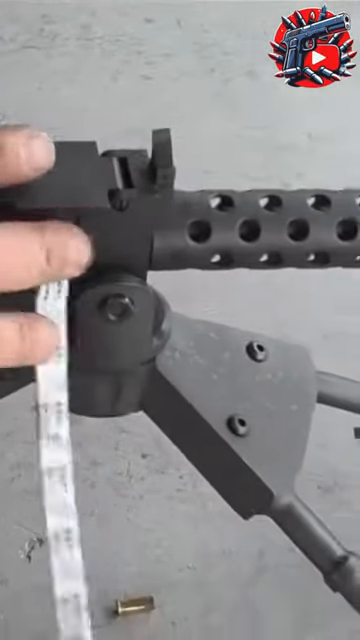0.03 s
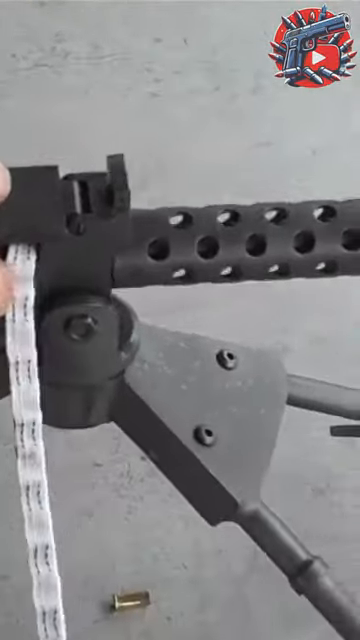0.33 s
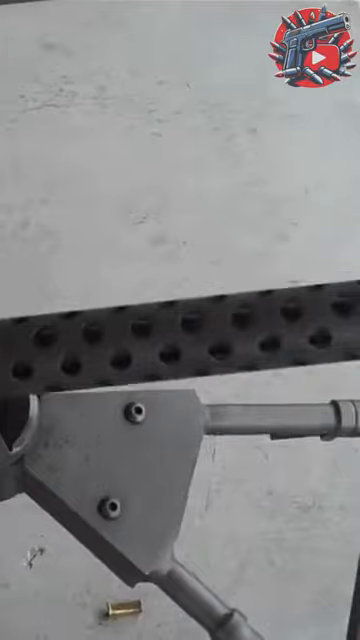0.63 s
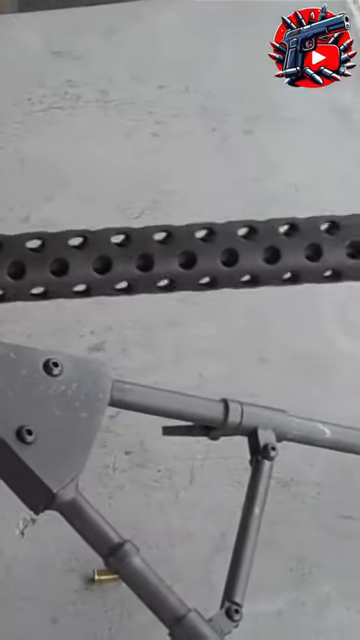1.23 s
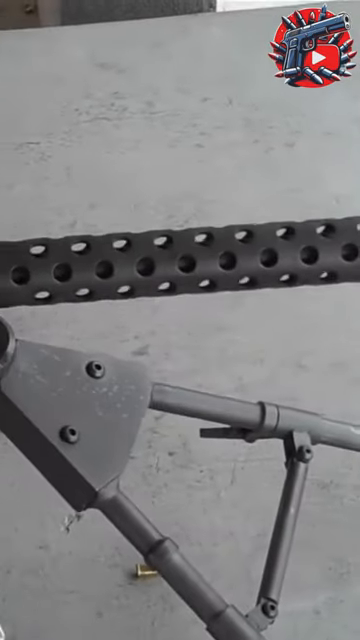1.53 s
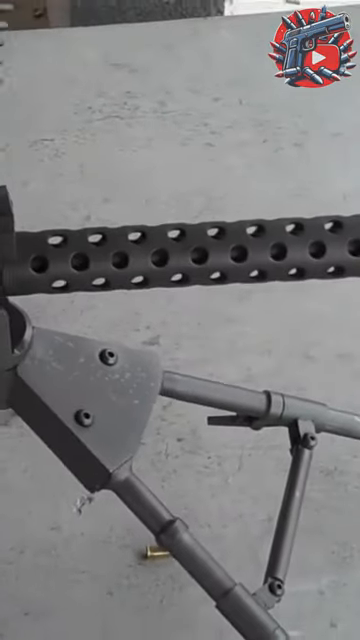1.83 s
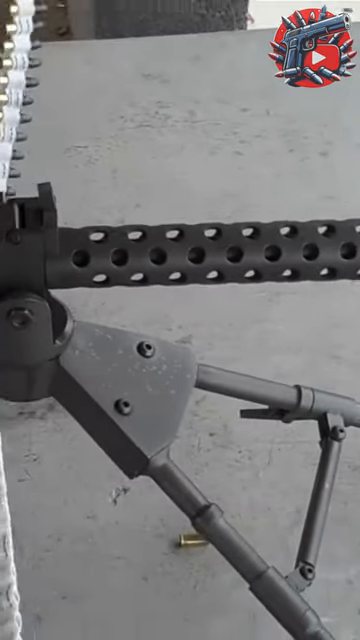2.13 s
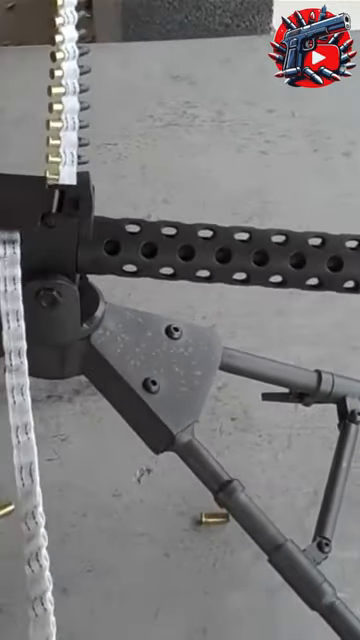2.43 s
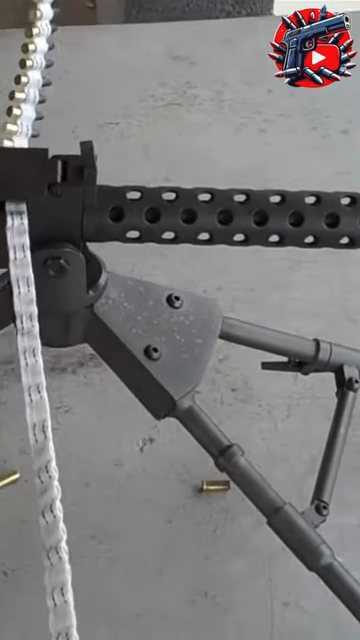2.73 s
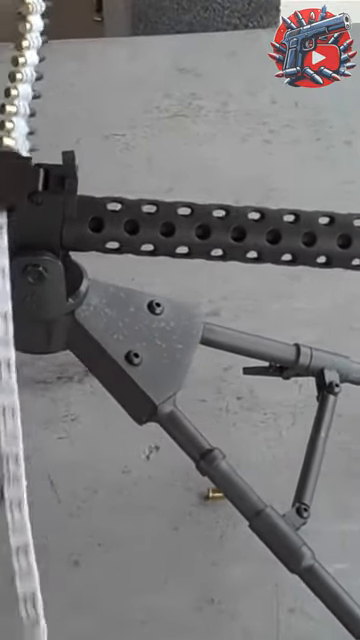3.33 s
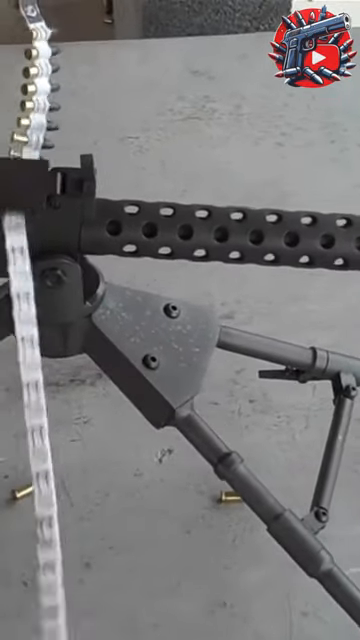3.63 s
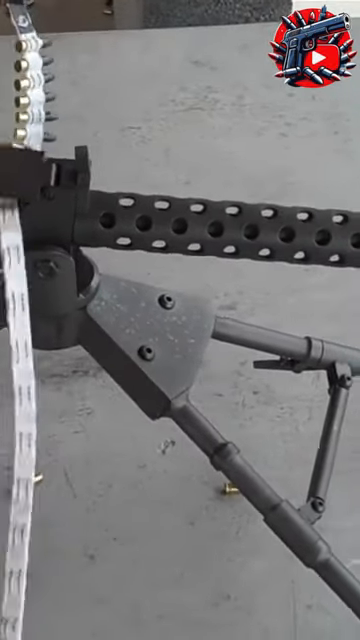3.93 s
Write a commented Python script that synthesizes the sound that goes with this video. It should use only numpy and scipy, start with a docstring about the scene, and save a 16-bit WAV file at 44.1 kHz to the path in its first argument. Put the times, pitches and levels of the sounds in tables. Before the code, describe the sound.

A small machine gun is readied and fired close by. Cartridges tinkle faintly, the action is cocked with steel clacks, and after a pause two quick bursts of shots ring out in a hard-walled shooting bay.

```python
"""A miniature belt-fed machine gun on a tripod, close to one microphone in a hard-walled shooting bay.
Over a faint rumble, brass cartridges tinkle as the belt is fed, the action is worked with steel
clacks, and the cloth belt slides over the floor. Then come two quick bursts, about fifteen shots
a second: each is a push of muzzle gas and a crack that swells in the near walls and dies in the room."""
import sys
import numpy as np
from scipy import signal
from scipy.fft import rfft, irfft
from scipy.io import wavfile

SR = 44100
rng = np.random.default_rng(int(sys.argv[2]) if len(sys.argv) > 2 else 0)


def file_out(sig):
    """Save sig as 16-bit WAV at sys.argv[1]."""
    # one column per channel
    cols = np.atleast_2d(sig).T
    # limit, then scale
    lim = np.clip(cols, -1, 1)
    pcm = np.round(lim * 32767).astype(np.int16)
    wavfile.write(sys.argv[1], SR, pcm)


N = 176400
T = np.arange(N) / SR


def from_db(db):
    """Decibels to gain."""
    return 10 ** (np.asarray(db) / 20)


def at_hz(points, hz):
    """Read a table on a log-frequency axis."""
    freqs, values = np.transpose(points)
    return np.interp(np.log(np.maximum(hz, 1)), np.log(freqs), values)


def add(out, start, sound):
    """Mix a sound in at a time in seconds."""
    i = int(start * SR)
    out[i:i + len(sound)] += sound[:N - i]


def colour(x, spectrum, tilt_db=0, size=4096):
    """Causal filter with a spectrum and a tilt per octave above 1 kHz; white noise keeps its level."""
    hz = np.arange(size // 2 + 1) * SR / size
    gain = from_db(at_hz(spectrum, hz) + tilt_db * np.log2(np.maximum(hz, 1000) / 1000))
    cepstrum = irfft(np.log(gain / np.sqrt(np.mean(gain ** 2))))
    cepstrum[1:size // 2] *= 2   # fold to minimum phase
    cepstrum[size // 2 + 1:] = 0
    return signal.fftconvolve(x, irfft(np.exp(rfft(cepstrum))))[:len(x)]


def ring(hits, modes, spread_db=0):
    """Hits (time, level) ring decaying modes, whose strengths scatter by spread_db at each hit."""
    out, t = np.zeros(N), T[:SR // 2]
    shapes = np.array([from_db(db - 60 * t / t60) * np.sin(2 * np.pi * hz * t) * (-1) ** k
                       for k, (hz, db, t60) in enumerate(modes)])
    for start, db in hits:
        add(out, start, from_db(db + spread_db * rng.standard_normal(len(modes))) @ shapes)
    return out


def spray(decay_s):
    """A short spray of tiny impulses that dies away."""
    t = T[:SR // 4]
    return rng.choice([-1, 1], len(t)) * np.exp(-t / decay_s)


def resonate(x, resonances):
    """Lift or cut narrow bands of a sound."""
    return x + sum((from_db(db) - 1) * signal.lfilter(*signal.iirpeak(hz, hz / width, fs=SR), x)
                   for hz, width, db in resonances)


# level of a faint low rumble that comes and goes: (time [s], level [dB])
RUMBLE_LEVEL = [(0, -96), (.6, -68.5), (1.05, -59.5), (1.35, -81), (1.55, -62.5), (1.8, -74), (2.2, -72.5),
                (2.45, -60.5), (2.9, -54.5), (3.15, -49.5), (3.6, -63)]
# spectra of the rumble and of the still air: (frequency [Hz], relative level [dB])
RUMBLE_SPECTRUM = [(25, 7), (60, -10.5), (150, -20.5), (400, -25.5), (900, -34), (3000, -56)]
AIR_SPECTRUM = [(25, 10.5), (60, -10.5), (150, -4), (400, -10), (900, -9.5), (2200, -17.5), (4000, -23),
                (8000, -27), (13500, -26)]

def background(air_db=-74):
    """The still air of the bay and a faint low rumble that comes and goes."""
    level_db = np.interp(T, *np.transpose(RUMBLE_LEVEL))
    rumble = from_db(level_db) * colour(rng.standard_normal(N), RUMBLE_SPECTRUM)
    return rumble + from_db(air_db) * colour(rng.standard_normal(N), AIR_SPECTRUM)


# cartridges touch, close by: (time [s], relative level [dB])
CASE_TOUCHES = [(0.0743, -58.5), (0.147, -60), (0.2142, -53), (0.2669, -52), (0.4672, -52), (0.5377, -59),
                (0.601, -52), (0.7025, -53.5), (0.7786, -60)]
# ring of a brass case: (frequency [Hz], relative level [dB], T60 [s])
BRASS_MODES = [(11910, -21.5, 0.29)]
# spectrum of a touch: (frequency [Hz], relative level [dB])
TOUCH_SPECTRUM = [(300, -39), (3500, -18), (4600, -7), (5350, 4.5), (6200, -12), (7500, -21), (13500, -32)]

def cartridges(tick_db=-5, jingle_db=-24):
    """Brass cases tick and ring in the belt; their neighbours shiver after each touch."""
    out = ring(CASE_TOUCHES, BRASS_MODES, spread_db=3)
    for start, db in CASE_TOUCHES:
        tick = from_db(tick_db) * spray(decay_s=0.0015)
        jingle = from_db(jingle_db) * spray(decay_s=0.049)
        add(out, start, from_db(db) * colour(tick + jingle, TOUCH_SPECTRUM))
    return out


# reverberation of the bay: (frequency [Hz], T60 [s])
BAY_DECAY = [(100, 0.42), (260, 0.43), (700, 0.51), (1840, 0.35), (4850, 0.31), (12800, .27)]

def bay_tail(rise_s):
    """One second of reverberation between hard walls: each band dies at its own rate."""
    white, hz, t = rfft(rng.standard_normal(SR)), np.arange(SR // 2 + 1), T[:SR]
    edges = np.r_[0, np.geomspace(125, SR / 2, 12)]
    tail = np.zeros(SR)
    for low, high in zip(edges, edges[1:]):
        band = irfft(white * ((hz >= low) & (hz < high)))
        tail += band * from_db(-60 * t / at_hz(BAY_DECAY, (low + high) / 2))
    return tail * (1 - np.exp(-t / rise_s))


def in_bay(direct, bounce_s=0.006, bounce_db=-17, reverb_db=-15):
    """A close sound reaches the microphone directly, off the floor and as reverberation."""
    bounce = from_db(bounce_db) * np.interp(T - bounce_s, T, direct, left=0)
    tail = bay_tail(rise_s=0.002)
    reverb = from_db(reverb_db) * signal.fftconvolve(direct, tail / np.linalg.norm(tail))[:N]
    return direct + bounce + reverb


# fingers on the gun: (time [s], contact level [dB], mount hum [dB])
FINGER_BUMPS = [(0.3631, -56, -70), (.53, -78, -70), (.59, -74, -72), (.74, -82, -76), (2.291, -69, -69)]
# spectrum of a contact on steel: (frequency [Hz], relative level [dB])
STEEL_SPECTRUM = [(100, -36), (500, -14), (800, -13), (1200, -8), (1900, -4.5), (2600, 4), (4000, -4.5),
                  (5200, -3), (8000, -10), (13500, -14.5)]
# tripod and cradle: (frequency [Hz], relative level [dB], T60 [s])
MOUNT_MODES = [(158, -25.5, 0.274), (299, -5.5, 0.23), (800, -4, 0.13), (828, 2.5, 0.17)]

def finger_bumps():
    """Fingers knock dully on the steel and set the mount humming."""
    out = ring([(start, hum_db) for start, _, hum_db in FINGER_BUMPS], MOUNT_MODES, spread_db=3)
    for start, db, _ in FINGER_BUMPS:
        add(out, start, from_db(db) * colour(spray(decay_s=0.0037), STEEL_SPECTRUM, tilt_db=-4))
    return out


# travel of the steel parts: (time [s], length [s], level [dB], tilt [dB/octave])
SLIDES = [(.46, .13, -77.5, -3.5), (1.076, 0.075, -52, -5), (1.16, 0.14, -59.5, -5.5), (1.532, 0.1, -54, 1),
          (1.806, 0.018, -44.5, 0.5), (1.854, 0.014, -38, 2.1)]
# what sliding stirs in the gun: (frequency [Hz], width [Hz], gain [dB])
SCRAPE_RESONANCES = [(826, 45, 23), (1430, 60, 8), (2850, 130, 0), (3550, 340, 3.5)]

def steel_slides():
    """Steel rubs on steel with a gritty scrape that grows until the part stops."""
    out, t = np.zeros(N), T[:SR // 4]
    for start, length, db, tilt_db in SLIDES:
        grit = rng.laplace(0, np.sqrt(0.5), len(t)) * (t / length) * (t < length)
        scrape = resonate(colour(grit, STEEL_SPECTRUM, tilt_db), SCRAPE_RESONANCES)
        add(out, start, from_db(db) * scrape)
    return out


# the action, at close range:
# (time [s], level [dB], contact decay [s], tilt [dB/octave], receiver ring [dB], mount hum [dB])
CLACKS = [(1.154, -26.5, 0.0045, -2.5, -33.5, -45.5), (1.2242, -36.5, 0.0016, -5, -62, -60),
          (1.229, -33, 0.0048, -7.5, -42.5, -46), (1.2607, -37, 0.0048, -6, -53, -47),
          (1.348, -54.5, 0.0014, -4, -80, -66), (1.477, -58, 0.018, 3.5, -87, -83),
          (1.499, -56.5, 0.0018, 7, -80, -92), (1.5362, -51.5, 0.0043, 1.1, -71, -72),
          (1.5511, -39, 0.0014, -1.5, -59, -60), (1.5566, -42.5, 0.0091, 2.5, -59, -77),
          (1.573, -43.5, 0.0036, -0.2, -70, -76), (1.6052, -26, 0.0025, -3.4, -56.5, -73),
          (1.612, -33.5, 0.003, 8.3, -58, -70), (1.6227, -20.5, 0.0019, -0.5, -53, -75.5),
          (1.6846, -41.5, 0.0046, -6, -47, -54.5), (1.8177, -36, 0.0069, 3.2, -58.5, -75.5),
          (1.8258, -26, 0.0026, -0.1, -67, -65), (1.8368, -40.5, 0.0067, 0.7, -77, -77),
          (1.8532, -36.5, 0.0037, 6, -66, -81), (1.8692, -21, 0.0083, 7.3, -76, -80),
          (1.8724, -18, 0.002, -4.5, -57.5, -51), (1.883, -26.5, 0.0066, 2, -59, -86),
          (1.9883, -39.5, 0.002, 7, -57.5, -64.5), (3.1663, -22, 0.018, 10.5, -38, -34)]
# receiver and barrel jacket: (frequency [Hz], relative level [dB], T60 [s])
RECEIVER_MODES = [(1215, -20.5, 0.12), (1420, -1.5, .13), (1590, -5, 0.094), (1805, -2, .12),
                  (1945, -3.5, 0.11), (2340, -1, 0.067), (2630, -3.5, 0.042), (2700, -12, 0.15),
                  (3500, 3, 0.036), (4280, -8, 0.048), (5060, -10, 0.06), (6740, -17, 0.047),
                  (8000, -33, .1), (10840, -32, 0.11), (11800, -25, 0.17)]

def steel_clacks():
    """Steel parts meet; each impact rings the receiver and the mount."""
    contacts = np.zeros(N)
    for start, db, decay_s, tilt_db, _, _ in CLACKS:
        add(contacts, start, from_db(db) * colour(spray(decay_s), STEEL_SPECTRUM, tilt_db))
    receiver = ring([(start, db) for start, *_, db, _ in CLACKS], RECEIVER_MODES, spread_db=3)
    mount = ring([(start, db) for start, *_, db in CLACKS], MOUNT_MODES, spread_db=3)
    return contacts + receiver + mount


# the handle reaches its stop: (time [s], level [dB])
HANDLE_STOPS = [(1.1545, -28)]
# ring of the handle: (frequency [Hz], relative level [dB], T60 [s])
HANDLE_MODES = [(1440, -6.5, 0.23), (306, -21.5, 0.35)]

def cocking_handle():
    """The cocking handle is pulled against its stop and rings."""
    return ring(HANDLE_STOPS, HANDLE_MODES)


# the bolt lands: (time [s], level [dB])
BOLT_STOPS = [(1.6048, -48.5), (1.8722, -23)]
# thud of the bolt: (frequency [Hz], relative level [dB], T60 [s])
BOLT_MODES = [(270, 3.5, 0.011), (470, 2.5, .011), (291, -22.5, 0.24)]

def bolt_thuds():
    """The bolt hits its stops with a low, dry thud."""
    return ring(BOLT_STOPS, BOLT_MODES)


# the belt on the floor by the tripod: (time [s], relative level [dB])
BELT_DRAG = [(2.05, -65), (2.082, -75.5), (2.166, -65.5), (2.21, -74.5), (2.302, -68.5), (2.382, -75.5),
             (2.514, -62), (2.702, -69.5), (3.02, -75), (3.12, -71.5)]
# spectrum of rubbing cloth: (frequency [Hz], relative level [dB])
CLOTH_SPECTRUM = [(100, -16.5), (300, -9.5), (900, -7.5), (1900, -4.5), (4000, -12), (8000, -15),
                  (13500, -22)]

def belt_slide(gain_db=-3.5, fade_s=0.45):
    """The cloth belt slides softly while the gun is aimed, fading in and out at the ends."""
    times, db = np.transpose(BELT_DRAG)
    level = from_db(np.interp(T, times, db) + gain_db)
    fade = np.exp(-np.abs(T - np.clip(T, times[0], times[-1])) / fade_s)
    return level * fade * colour(rng.standard_normal(N), CLOTH_SPECTRUM)


# two bursts, close by:
# (time [s], report level [dB], gas push [dB], time until the report is loudest [s])
SHOTS = [(3.1744, -13.5, -7.5, 0.025), (3.2403, -20, -11, 0.011), (3.3051, -23, -31, 0.0068),
         (3.3763, -22.5, -36, 0.0088), (3.4397, -24, -23, 0.012), (3.641, -24.5, -45, .011),
         (3.7079, -24, -53, .012), (3.7729, -24, -25, 0.014), (3.8371, -24.5, -43, 0.0098),
         (3.9034, -24, -40, 0.013), (3.9675, -23.5, -27, 0.01)]
# spectra of the early blast and of the late boom: (frequency [Hz], relative level [dB])
BLAST_SPECTRUM = [(40, -19.5), (100, -4.5), (170, 0.5), (400, 4), (650, 5), (1200, 0.5), (2000, -1.5),
                  (4000, -5), (7400, -8.5), (8600, -12), (13500, -14)]
BOOM_SPECTRUM = [(40, -45.5), (100, -10.5), (170, -1.5), (400, -4.5), (700, -7.5), (1200, -1.5), (2000, -6),
                 (4000, -10), (8000, -16.5), (13500, -22.5)]
# what the shots stir in the bay: (frequency [Hz], width [Hz], gain [dB])
BAY_RESONANCES = [(269, 11, 3.5), (384, 6.8, 3.5), (608, 42, 2.5), (773, 8.9, 4.5), (959.4, 11, 5),
                  (1058, 19, 5), (1260, 24, 4), (1270, 24, -5.5), (1493, 28, 3), (1617, 38, 3),
                  (1955, 22, -1), (2226, 29, 4)]

def gunfire(push_s=0.0012, crack_db=4.5, boom_db=2.5, boom_rise_s=0.016, wall_share=0.67):
    """Muzzle gas pushes out with a sharp crack; the report swells and the bay booms after."""
    reports, pushes = np.zeros(N), np.zeros(N)
    age = T[:SR // 10] / push_s
    pulse = 2 * np.sin(np.pi * age / 2) * np.exp(-age)
    walls = np.array([rng.standard_normal(SR), bay_tail(boom_rise_s)])
    for start, db, push_db, peak_s in SHOTS:
        # every shot meets the same walls, but its gas cloud differs
        gas = np.array([rng.standard_normal(SR), bay_tail(boom_rise_s)])
        near, late = np.sqrt(wall_share) * walls + np.sqrt(1 - wall_share) * gas
        width_s = 0.011 + 0.3 * peak_s   # a report that peaks later also lasts longer
        blast = near * np.exp(-0.5 * ((T[:SR] - peak_s) / width_s) ** 2)
        add(blast, 0, from_db(crack_db) * spray(decay_s=0.00078))
        report = colour(blast, BLAST_SPECTRUM) + from_db(boom_db) * colour(late, BOOM_SPECTRUM)
        add(reports, start, from_db(db) * report)
        add(pushes, start, from_db(push_db) * pulse)
    return resonate(reports, BAY_RESONANCES) - pushes


def scene():
    """Mono, from beside the tripod: the gun is loaded, cocked, aimed and fired."""
    handling = cartridges() + finger_bumps() + steel_slides() + steel_clacks() + cocking_handle()
    return (background() + in_bay(handling) + bolt_thuds() + belt_slide() + gunfire())[None]


def record(dry):
    """The loudest peaks are rounded and the top treble is cut."""
    rounded = 0.77 * np.tanh(dry / 0.79)
    lowpass = signal.ellip(10, 0.2, 80, 13850, fs=SR, output="sos")
    return signal.sosfilt(lowpass, rounded)


dry = scene()
out = record(dry)
file_out(out)
```